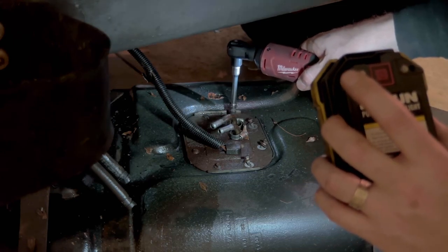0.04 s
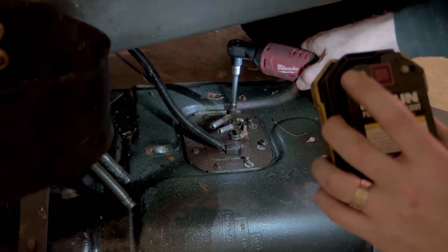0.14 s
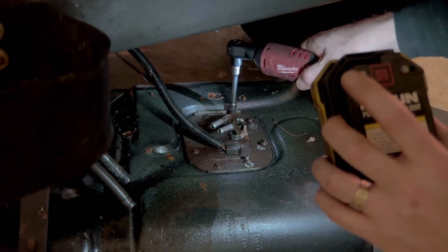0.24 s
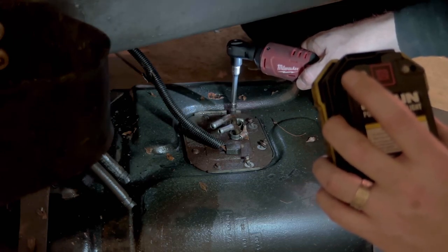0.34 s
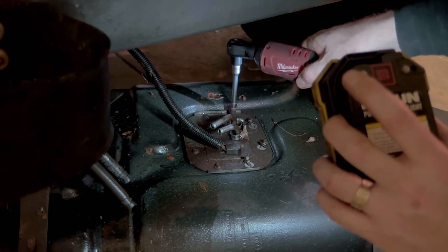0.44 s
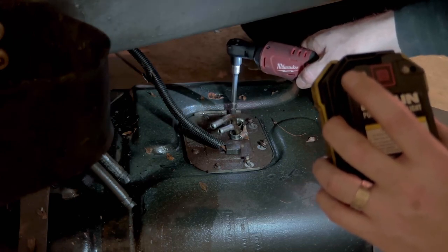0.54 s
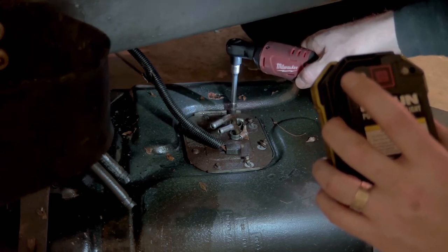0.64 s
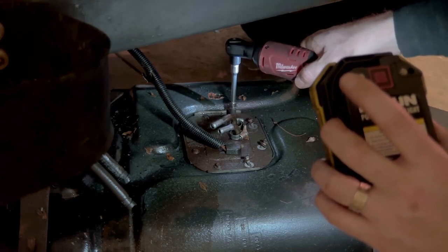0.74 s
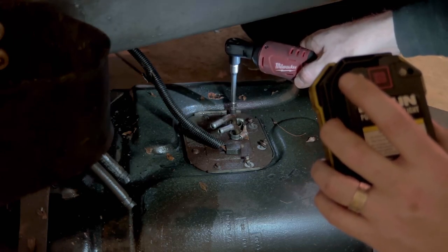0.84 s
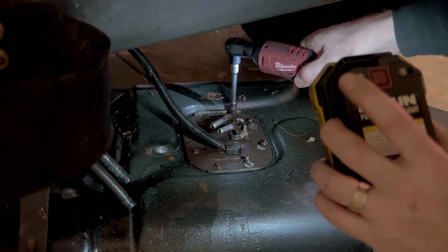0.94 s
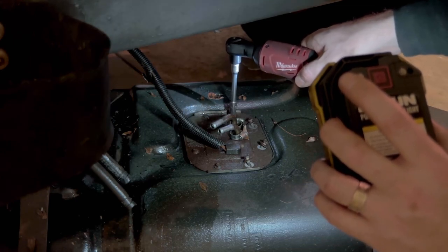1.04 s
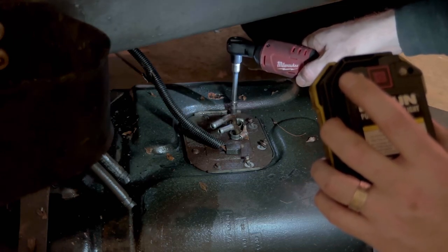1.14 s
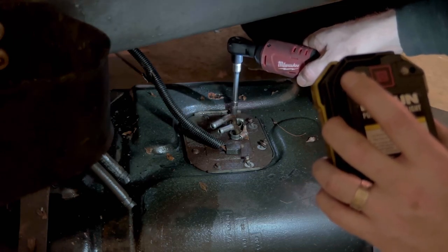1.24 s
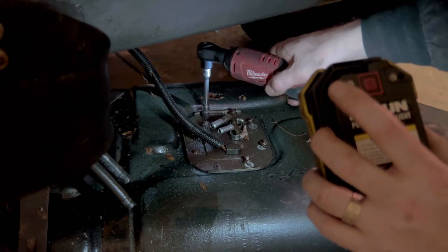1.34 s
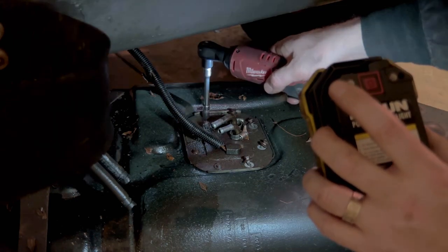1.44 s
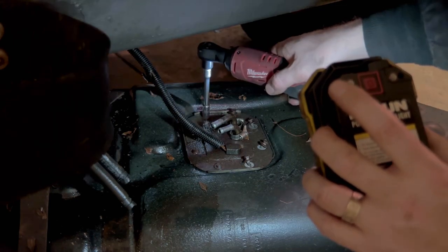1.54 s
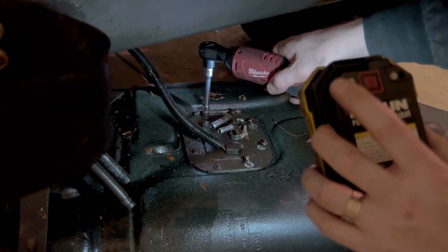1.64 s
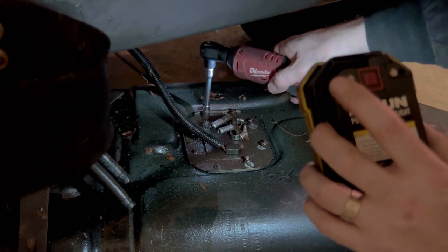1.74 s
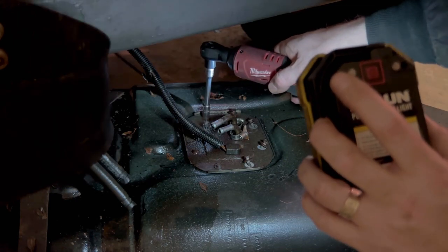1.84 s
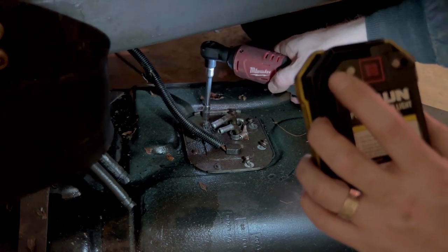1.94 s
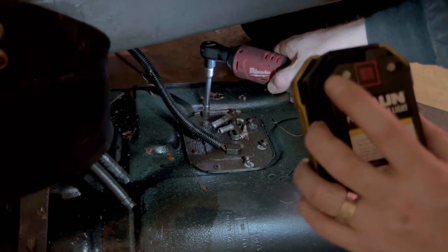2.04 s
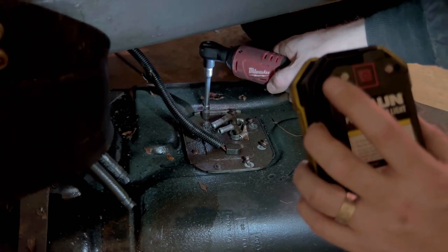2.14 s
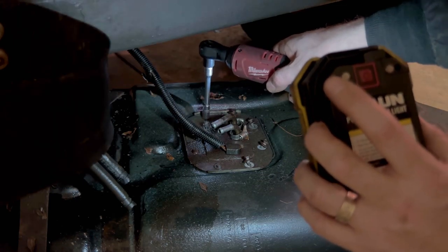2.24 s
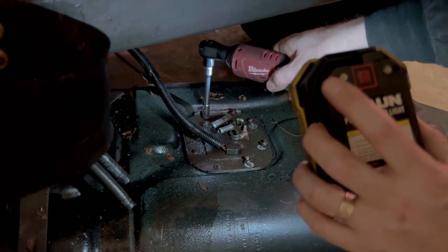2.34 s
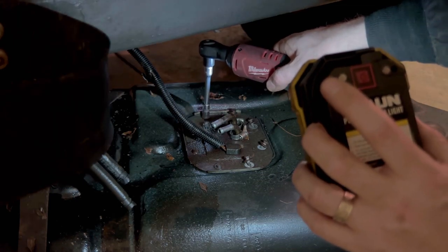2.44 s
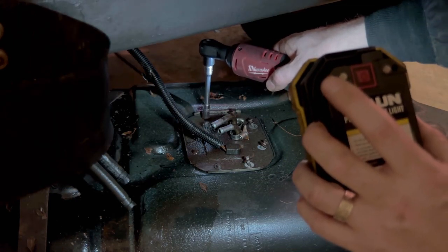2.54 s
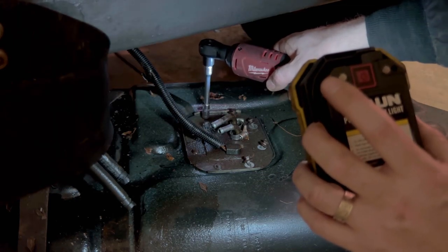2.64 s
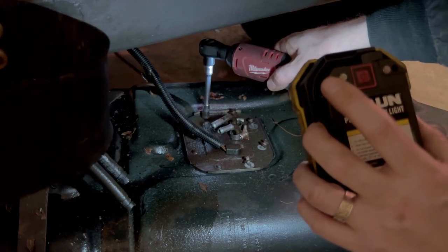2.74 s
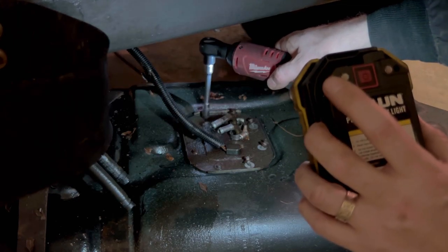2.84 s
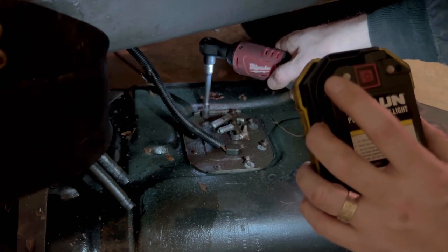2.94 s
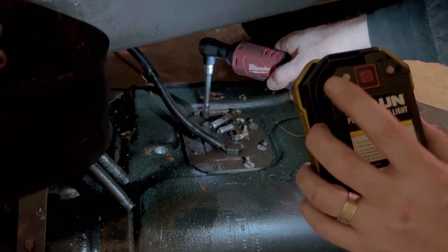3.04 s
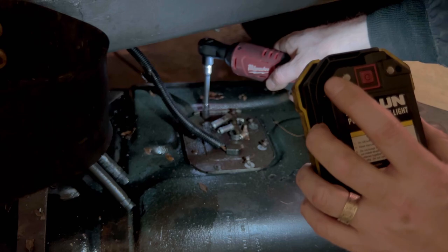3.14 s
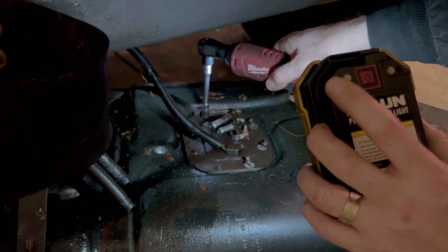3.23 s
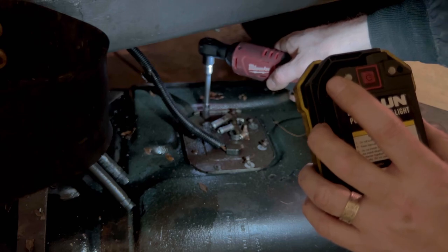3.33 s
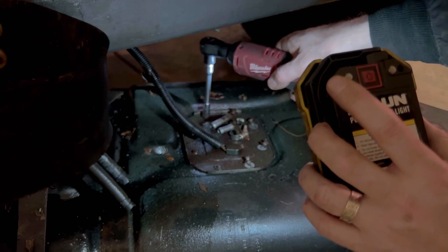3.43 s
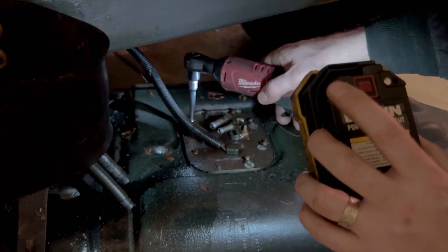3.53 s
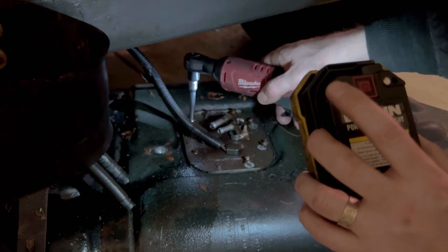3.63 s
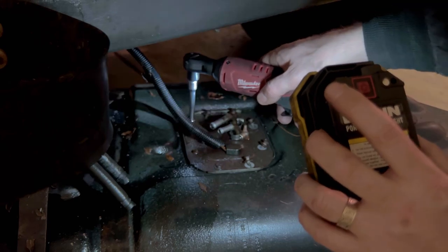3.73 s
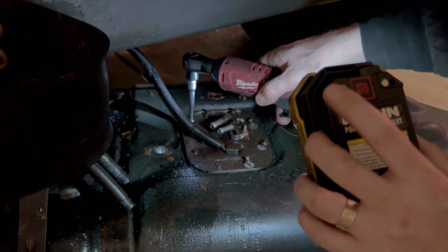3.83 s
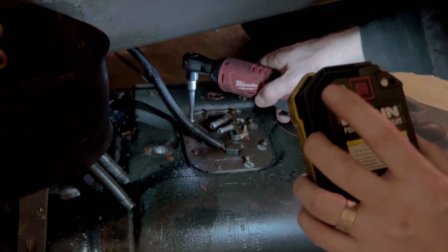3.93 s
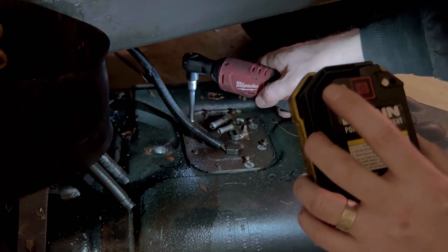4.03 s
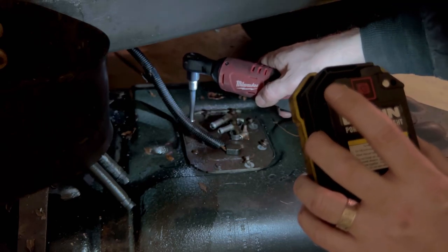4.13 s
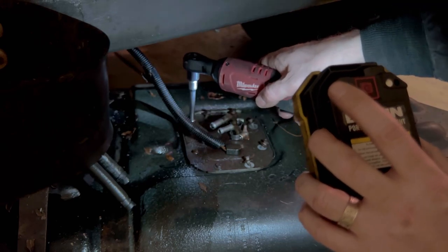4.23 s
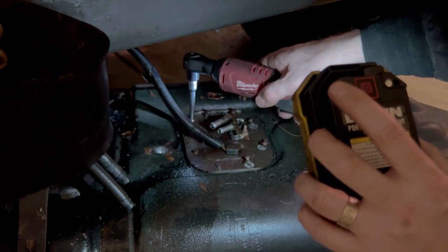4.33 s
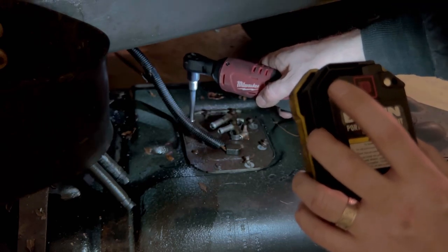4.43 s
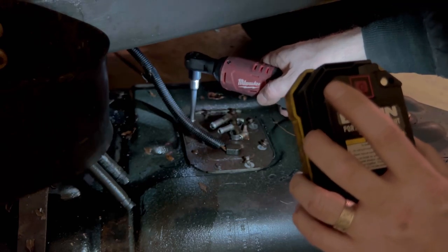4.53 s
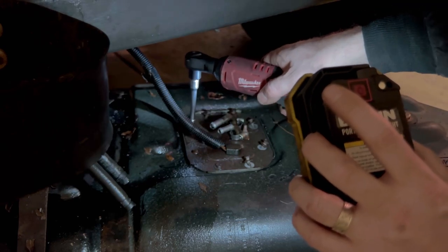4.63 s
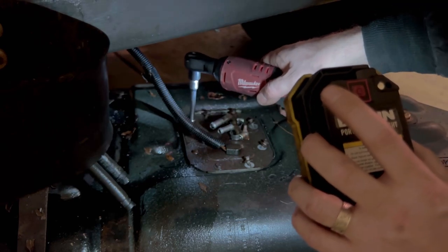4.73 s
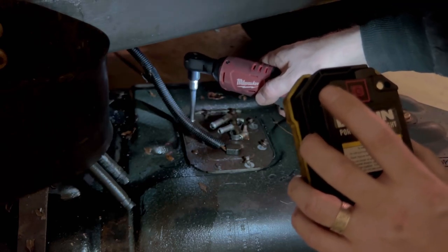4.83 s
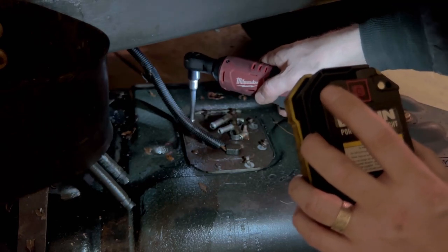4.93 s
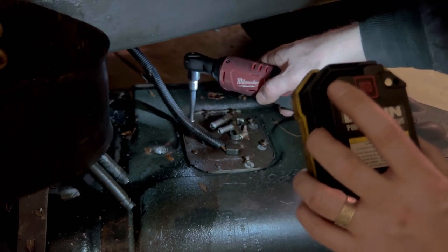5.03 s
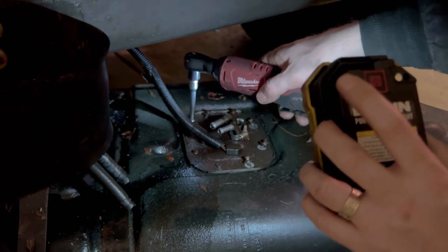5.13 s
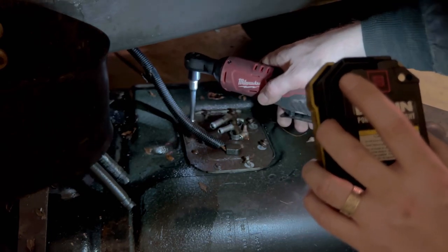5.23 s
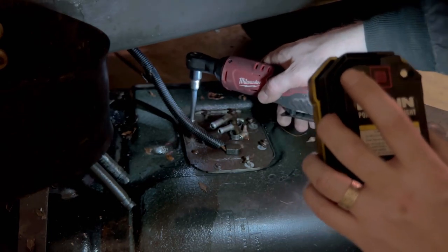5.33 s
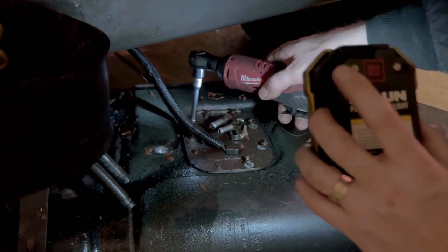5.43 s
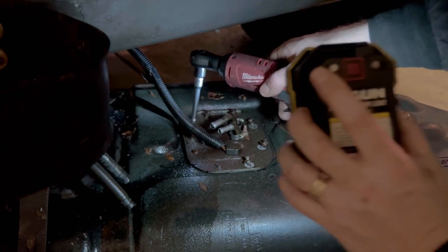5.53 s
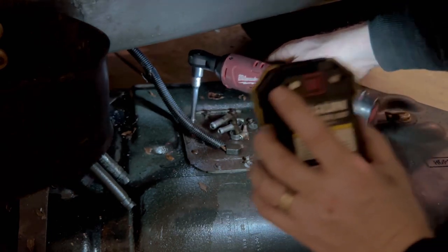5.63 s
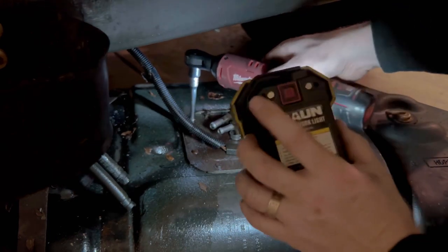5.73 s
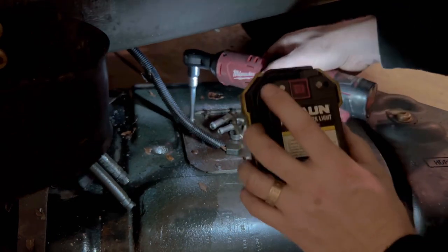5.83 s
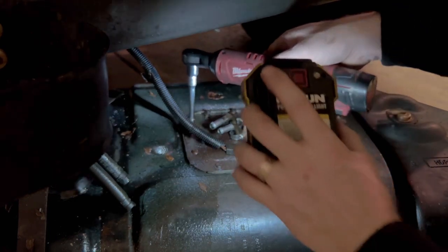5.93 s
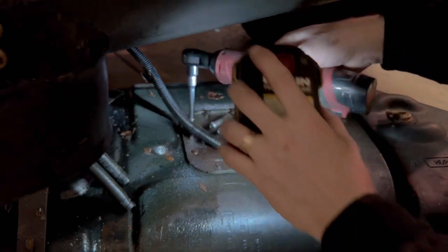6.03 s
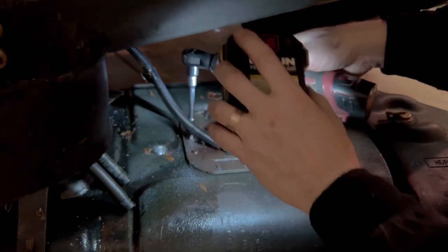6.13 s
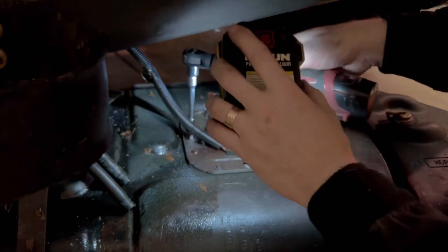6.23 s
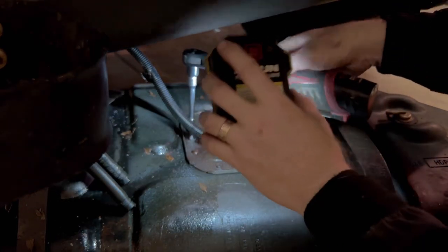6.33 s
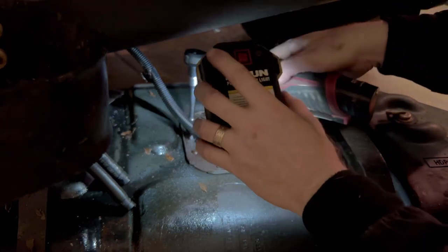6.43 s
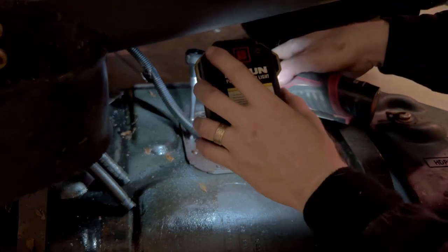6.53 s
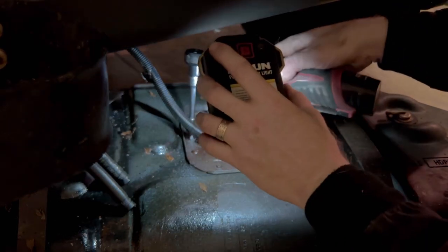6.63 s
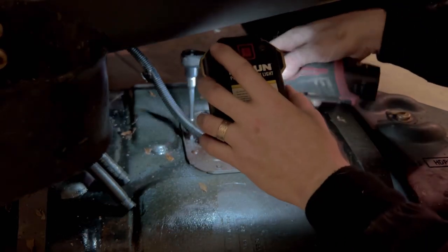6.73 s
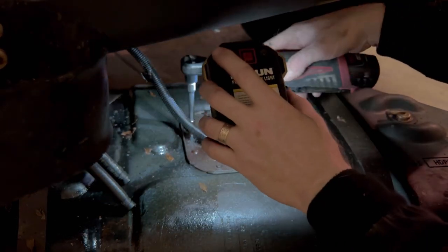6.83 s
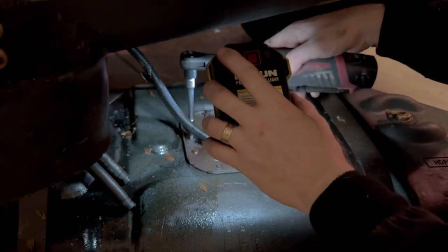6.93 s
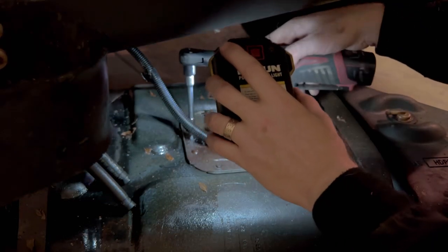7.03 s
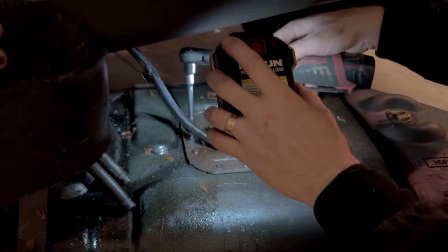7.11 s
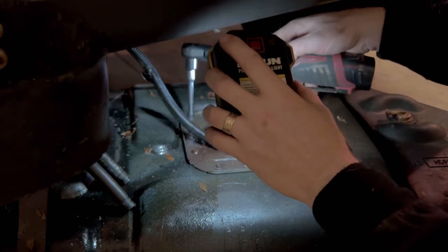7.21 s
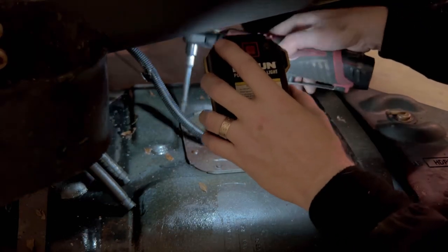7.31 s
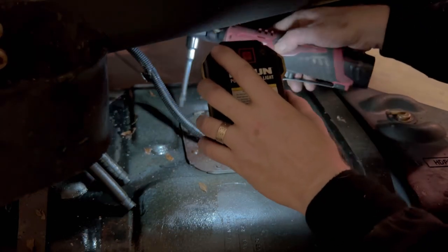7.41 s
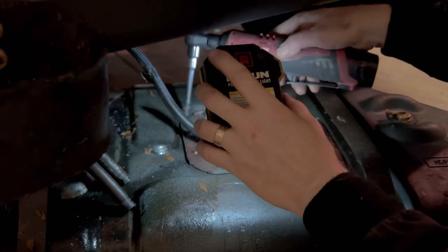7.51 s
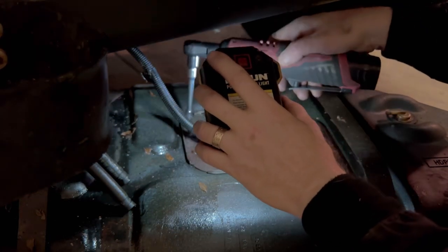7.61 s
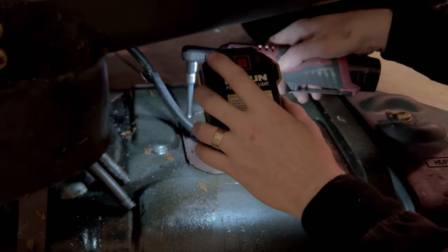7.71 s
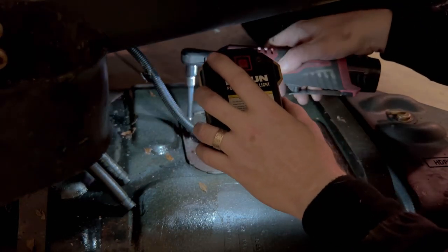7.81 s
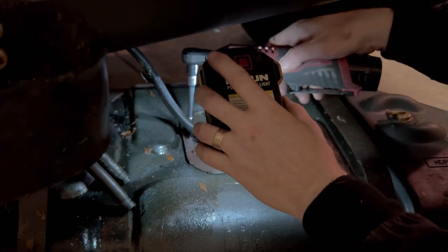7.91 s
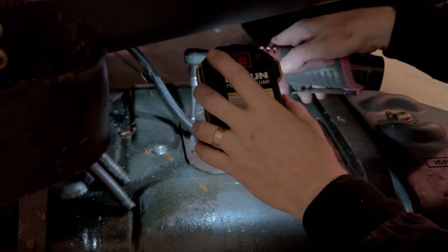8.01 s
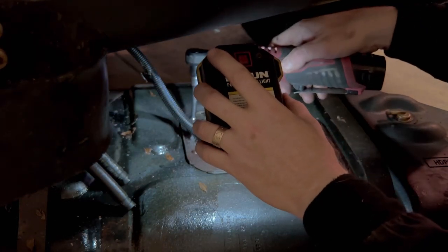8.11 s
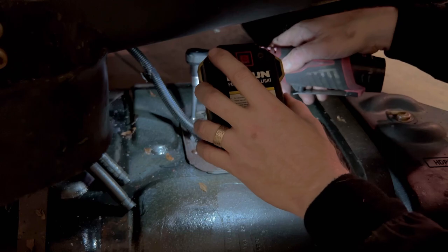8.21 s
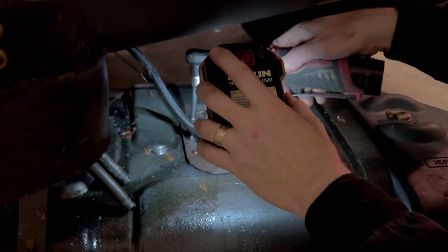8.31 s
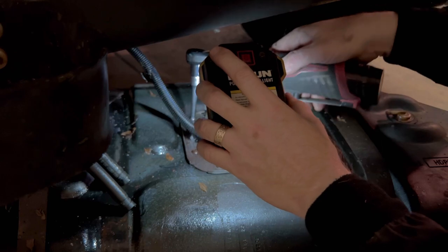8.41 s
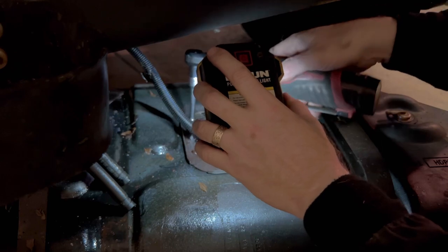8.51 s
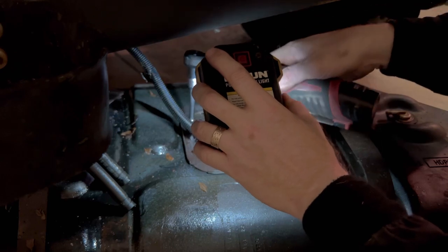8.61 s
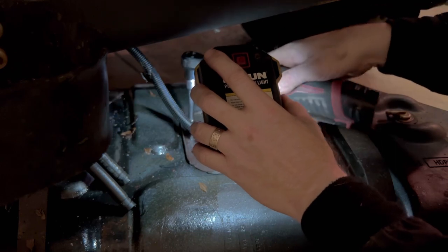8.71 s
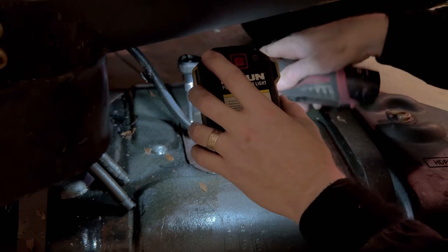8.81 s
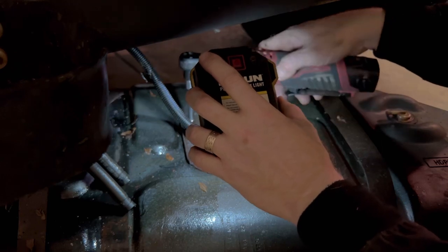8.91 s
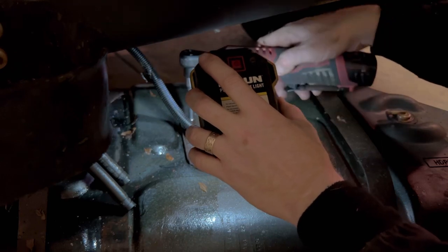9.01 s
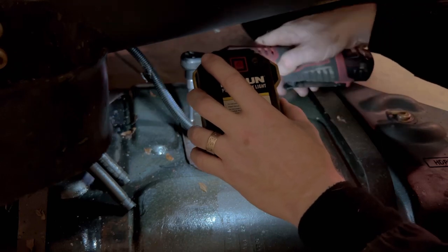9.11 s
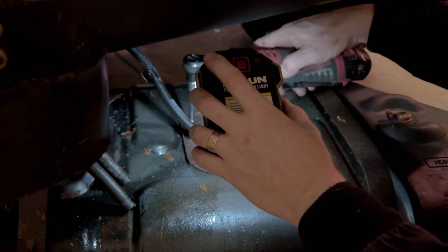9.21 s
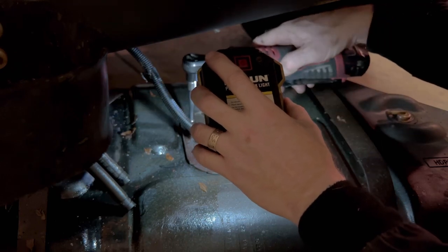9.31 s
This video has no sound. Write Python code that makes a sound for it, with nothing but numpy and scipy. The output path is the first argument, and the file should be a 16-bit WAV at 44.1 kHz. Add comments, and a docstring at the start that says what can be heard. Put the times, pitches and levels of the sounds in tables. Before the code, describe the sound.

Close in a garage, a cordless ratchet is already running, its gears whirring with fast pawl clicks and a thin high motor whine. A knock, then the bit bears down and the hollow steel tank booms. The run breaks off abruptly, a second starts and coasts down into slowing clicks. Tool knocks, a brief sleeve rustle and sparse taps follow over low rumble.

```python
"""A cordless ratchet runs in bursts on screws in a steel tank, close by in a garage. A motor drives a crank through gears;
each turn rocks the yoke, filtered noise makes the gear whirr, and the pawl clicks over the teeth into steel resonances.
The tank booms in noise and crank-rate tones when the bit bears on it. A cut breaks off one run in mid-sound; the last
coasts down. Damped bursts make the knocks of tool and hand; a low rumble, faint hiss and sleeve rustle are shaped noise."""
import sys
import numpy as np
from scipy import signal
from scipy.fft import rfft, irfft, next_fast_len
from scipy.io import wavfile
from scipy.ndimage import uniform_filter1d, map_coordinates

SR = 44100
rng = np.random.default_rng(int(sys.argv[2]) if len(sys.argv) > 2 else 0)


def store_wav(level_fs):
    """Save 16-bit WAV to argv[1]."""
    pcm = np.round(np.clip(np.atleast_2d(level_fs), -1, 1) * 32767)
    wavfile.write(sys.argv[1], SR, pcm.T.astype(np.int16))


def gain_from_db(level_db):
    """Convert decibel levels to linear amplitude factors (20 dB per decade)."""
    decades = np.asarray(level_db, float) / 20
    return 10 ** decades


N = 412762
T = np.arange(N) / SR
CUT_S, RESTART_S = 3.563, 4.025

# Stretches on a screw. Each row: start in seconds, end in seconds, motor whine in Hz before sag and droop,
# sag at the bite in Hz, relative whine level in dB.
STRETCHES = [(0, 1.34, 1937, 0, -33), (1.34, 3.563, 1938, 62, -32), (4.008, 5.15, 1925, 45, -35.5)]
# Pawl drops in one crank turn. Each row: phase from 0 to 1, relative level in dB.
TEETH = [(.47, 1.5), (.62, 0.5), (.81, -10)]
# Ringing panels of the hollow tank. Each row: frequency in Hz, relative level in dB, t60 in seconds.
TANK_PANELS = [(114.5, -1, .3), (188, -1, .2), (264, -2.5, 0.25), (377.6, -5, 0.22), (451, -8, 0.12),
               (517, -6, .08), (720, -3.5, 0.087), (870, 0.5, 0.083), (1303, -9.5, .1), (1437, -9.5, 0.069),
               (1510, -3.5, .1)]


def unit(x):
    """Scaled to rms 1."""
    return x / np.sqrt(np.mean(x ** 2) + 1e-20)


def curves(rows):
    """One value per sample for each column after the time."""
    s, *cols = np.transpose(rows)
    return [np.interp(T, s, c) for c in cols]


def during(*spans, edge_s=.002):
    """1 inside any (from, to) span, 0 outside, with soft edges."""
    inside = sum((T >= start) & (T <= end) for start, end in spans)
    return np.abs(uniform_filter1d(inside * 1., size=round(edge_s * SR)))


def wobble(rate):
    """A smooth random curve, rate knots a second."""
    return map_coordinates(rng.standard_normal(int(N * rate / SR) + 4), [T * rate])


def filtered(x, response):
    """x times a complex response of frequency."""
    m = next_fast_len(N + 8192)  # room for the ring-out
    return irfft(rfft(x, m) * response(np.fft.rfftfreq(m, 1 / SR)), m)[:N]


def along(points, hz):
    """(Hz, value) points on a log axis."""
    f, v = np.transpose(points)
    return np.interp(np.log(hz + 1), np.log(f + 1), v)


def noise(spectrum):
    """Coloured noise of rms 1."""
    return unit(filtered(rng.standard_normal(N), lambda hz: gain_from_db(along(spectrum, hz))))


def resonances(peaks):
    """Causal response of a few (Hz, width Hz, dB) resonances, alternating in sign."""
    def response(f):
        total = 0
        for k, (centre, width, db) in enumerate(peaks):
            damping = 1j * f * width
            total = total + (-1) ** k * gain_from_db(db) * damping / (centre * centre - f * f + damping)
        return total
    return response


def ridged(x, depth_db):
    """Many small housing modes: narrow ridges of gain that drift as the grip shifts."""
    z = signal.stft(x, nperseg=2048)[2]
    across_hz = uniform_filter1d(rng.standard_normal(z.shape), size=3, axis=0)
    field = uniform_filter1d(across_hz, size=14, axis=1)
    return signal.istft(z * gain_from_db(depth_db * unit(field)), nperseg=2048)[1][:N]


def orders(turns, table):
    """Unsteady tones at whole multiples of the crank rate."""
    return sum(gain_from_db(db + 4.03 * wobble(5)) * np.sin(2 * np.pi * (k * turns + k * k / 7)) for k, db in table)


def room():
    """Unsteady low rumble, faint hiss that stirs with it, and a sleeve brushing past."""
    # Rumble swells. Each row: time in seconds, level in dB.
    rumble_level = [(3.6, -43), (5.8, -42), (6.0, -46.5), (7.7, -48), (8.1, -43), (8.4, -39), (8.63, -43.5),
                    (8.95, -39.5), (9.36, -41.5)]
    # Rumble colour. Each row: frequency in Hz, relative density in dB per Hz.
    rumble_colour = [(15, -60), (25, -24.5), (46, -12), (64, 0.5), (168, -17.5), (184, -31.5), (220, -22.5),
                     (300, -22.5), (390, -50.5), (660, -120)]
    # Hiss colour. Each row: frequency in Hz, relative density in dB per Hz.
    hiss_colour = [(120, -39.5), (200, -8.5), (320, -8), (700, -14.5), (1300, -19.5), (4300, -26.5),
                   (4700, -32), (8400, -35), (8900, -39.5), (13500, -39.5), (16000, -54)]
    # Sleeve and hand sliding. Each row: start in seconds, length in seconds, level in dB.
    rustle_strokes = [(5.747, .8, -57.5), (5.81, 0.24, -52)]
    # Cloth colour. Each row: frequency in Hz, relative density in dB per Hz.
    cloth_colour = [(590, -46), (1000, -15), (1490, -3), (3410, -2), (9690, -12.5), (11500, -13.5),
                    (15500, -30)]
    rumble_db, = curves(rumble_level)
    rumble = gain_from_db(rumble_db + 1.5 * wobble(6.8)) * noise(rumble_colour)
    hiss_db = -56 + 0.69 * (rumble_db + 45)  # grows 0.69 dB per dB of rumble
    hiss = gain_from_db(hiss_db + wobble(2.2)) * noise(hiss_colour)
    strokes = sum(gain_from_db(db) * np.sin(np.pi * np.clip((T - s) / length, 0, 1)) for s, length, db in rustle_strokes)
    rustle = strokes * gain_from_db(1.0 * wobble(65)) * noise(cloth_colour)
    return rumble + hiss + rustle


def ring(modes, t):
    """Decaying sines of struck steel; every blow excites each mode a little differently."""
    return sum(gain_from_db(db + rng.normal(0, 4.4) - 60 * t / t60) * np.sin(2 * np.pi * hz * t) for hz, db, t60 in modes)


def knocks():
    """Each knock is a short damped burst, dull or bright, with steel and tank ring and the garage's diffuse tail."""
    # Tool on tank and hand on tool. Each row: time in seconds, relative crack level in dB,
    # low level in dB re crack, treble level in dB re crack.
    hits = [(1.352, -6, -9.5, -14), (3.9282, -34, -22, -3), (5.5228, -20, -10, -1), (5.687, -29.5, -14, -5),
            (5.7015, -19.5, -4, -7.5), (5.736, -31, -0.5, -9), (6.1926, -53, -11.5, -17),
            (6.7162, -12.5, -15.5, -6.5), (6.859, -46, -1, -14), (7.187, -52.5, 3.5, -9),
            (7.236, -50, -4, -17), (7.254, -49, -3, -23), (7.8205, -51, 12, -21), (7.9905, -37, 1.5, -25),
            (8.157, -62, 14, -18), (8.2945, -16.5, -11.5, -15), (8.4916, -49, -5, -16.5),
            (8.7632, -40.5, -6, -9), (8.8166, -41, 1, -19.5), (8.9306, -50, -7, -18),
            (8.9522, -41, 2.5, -11), (9.1894, -49, -2, -3), (9.338, -46, -9, -15.5)]
    # Crack, thud, body and treble. Each row: low edge in Hz, high edge in Hz, blow t60 in seconds,
    # garage t60 in seconds.
    knock_bands = [(1910, 4500, .018, 0.3), (90, 630, 0.14, 0.43), (610, 2100, 0.045, 0.43),
                   (4500, 8000, 0.034, 0.34)]
    # Extension bar modes. Each row: frequency in Hz, relative level in dB, t60 in seconds.
    bar_modes = [(1850, -25, .2), (2700, -24, .2), (3270, -13, .07), (3750, -20, .2), (6700, -31, .15)]
    garage_db, boom = -16, 0.38  # garage re blow; dB of tail per dB of low: dull knocks linger
    out, t = np.zeros(N + SR), np.arange(SR // 2) / SR
    filters = [signal.butter(3, row[:2], "bandpass", fs=SR, output="sos") for row in knock_bands]
    swell = 1 - np.exp(-t / 0.0019)  # the tail builds up behind the blow
    contact = np.sin(np.pi / 2 * np.clip(t / .0006, 0, 1)) ** 2  # 0.6 ms rise
    for s, db, low_db, treble_db in hits:
        tail_db = garage_db + boom * np.clip(low_db + 15, 0, 11)
        white_blow = gain_from_db(1.4 * treble_db + 1.5 - 60 * t / 0.016)
        white_tail = swell * gain_from_db(1.6 * treble_db + garage_db + 7.0 - 60 * t / 0.2)
        white = (white_blow + white_tail) * rng.standard_normal(len(t))  # first contact is white
        sound = ring(bar_modes, t) + gain_from_db(low_db - 6.5) * ring(TANK_PANELS, t)
        band_db = [0, low_db - 4, low_db + 2, treble_db]
        for band, (_, _, blow_t60, room_t60), level in zip(filters, knock_bands, band_db):
            shape = gain_from_db(-60 * t / blow_t60) + swell * gain_from_db(tail_db - 60 * t / room_t60)
            settled = signal.sosfilt(band, rng.standard_normal(len(t) + 900))[900:]  # skip the filter's onset
            sound = sound + gain_from_db(level) * shape * unit(settled)
        out[round(s * SR):][:len(t)] += gain_from_db(db - 4) * (white + contact * sound)
    return out[:N]


def motor_pitch():
    """Whine pitch and level: each bite drags the motor down, it recovers, then droops slowly."""
    recover_s, droop_hz_per_s, sag_db_per_hz = .125, 2.8, .14
    starts = [row[0] for row in STRETCHES]
    current = np.searchsorted(starts, T, "right") - 1
    start, _, hz, bite, db = np.transpose(STRETCHES)[:, current]
    sag = bite * np.exp(-(T - start) / recover_s)
    return hz - sag - droop_hz_per_s * (T - start), db - sag_db_per_hz * sag


def whine():
    """A thin stack of tones from the motor and its speed control."""
    # Tones of the stack. Each row: multiple of the whine pitch, relative level in dB.
    whine_orders = [(1, -10.5), (3, 0), (4, -13), (5, -27)]
    hz, db = motor_pitch()
    cycles = np.cumsum(hz + .6 * wobble(15)) / SR
    stack = sum(gain_from_db(level) * np.sin(2 * np.pi * k * cycles) for k, level in whine_orders)
    running = during((0, CUT_S), STRETCHES[-1][:2])
    return running * gain_from_db(db + 3.0 + 2.7 * wobble(10)) * stack


def crank():
    """Turns per second, and turns so far counted from a pawl drop."""
    whine_per_crank, spin_up_s = 26.33, .04
    release_s, coast_per_s2 = 5.158, 162  # trigger let go; turns per second lost each second
    tooth_s = 5.2909  # a moment at which the pawl drops
    rising = 1 - (T > CUT_S) * np.exp(-np.clip(T - RESTART_S, 0, None) / spin_up_s)
    driven = rising * motor_pitch()[0] / whine_per_crank
    speed = np.clip(driven - coast_per_s2 * np.clip(T - release_s, 0, None), .01, None)
    turns = np.cumsum(speed) / SR
    return speed, turns + (TEETH[0][0] - turns[round(tooth_s * SR)]) % 1


def panels():
    """Vibration from the bit keeps the five lowest tank panels ringing."""
    peaks = [(hz, np.log(1000) / (np.pi * t60), db) for hz, db, t60 in TANK_PANELS[:5]]  # width from t60
    return unit(filtered(rng.standard_normal(N), lambda hz: resonances(peaks)(hz) ** 2))


def tank_drone(turns, pace, rock, drone_db, load):
    """The upper tank panels drone under the bearing bit: ridged noise and tones of the crank."""
    # Upper panel modes. Each row: frequency in Hz, relative density in dB per Hz.
    tank_colour = [(260, -34), (450, -3.5), (587, -0.5), (670, -4.5), (846, -1.5), (1070, -4.5),
                   (2200, -4.5), (2860, -32), (4840, -120)]
    # Crank tones. Each row: multiple of the crank rate, relative level in dB.
    tank_orders = [(7, -13), (8, -14), (9, -17), (10, -13), (11, -14.5), (12, -13.5)]
    grain = unit(rock * ridged(noise(tank_colour), depth_db=3.0))
    tones = (0.69 + 0.4 * load) * pace ** 4 * orders(turns, tank_orders)
    return gain_from_db(drone_db - 2.0) * (grain + tones)


def tank_thump(turns, pace, drone_db, seat):
    """The hollow tank thumps below the drone, and its low panels sing under a seated bit."""
    # Hollow body. Each row: frequency in Hz, relative density in dB per Hz.
    deep_colour = [(53, -33), (90, -4), (183, -1), (216, -7.5), (254, -2.5), (378, 1), (450, -7.5),
                   (580, -37), (990, -120)]
    # Crank tones. Each row: multiple of the crank rate, relative level in dB.
    deep_orders = [(2, -9), (3, -11), (4, -11), (5, -6)]
    # grows 1.2 dB per dB of drone, 3 dB more when seated
    thump_db = -40 + 1.2 * (drone_db + 31.5) + 3 * seat + 0.5 * wobble(9)
    boom = noise(deep_colour) + 0.83 * pace ** 4 * orders(turns, deep_orders)
    mix = (1 - 0.17 * seat) * boom + gain_from_db(-4.5) * seat * panels()
    return gain_from_db(thump_db - 1.84 + 1.2 * wobble(30)) * mix


def shaft_tones(turns, pace, whirr_db, hum_size):
    """Hum at the crank rate, two tones of the motor shaft and a firm fifth crank order."""
    motor_turns = 4.39 * turns  # motor turns per crank turn
    hum = pace ** 2 * hum_size * gain_from_db(2.7 * wobble(12)) * np.sin(2 * np.pi * turns)
    shaft = np.sin(2 * np.pi * motor_turns) + .45 * np.sin(4 * np.pi * motor_turns)
    motor = pace ** 4 * gain_from_db(whirr_db - 27.5 + 2 * wobble(10)) * shaft
    fifth = pace ** 4 * gain_from_db(whirr_db - 30 + 3 * wobble(8)) * np.sin(2 * np.pi * 5 * turns)
    return hum + motor + fifth


def yoke(turns):
    """Once a turn the yoke slaps the head; each mode takes its own share of each slap."""
    # Ratchet head and extension bar. Each row: frequency in Hz, width in Hz, relative level in dB.
    head_modes = [(2310, 910, -1), (3590, 550, 0), (5850, 720, -1.5)]
    phase, turn = turns % 1, turns.astype(int)
    slap = (1 - np.exp(-phase / 0.017)) * np.exp(-phase / 0.23)
    shares = gain_from_db(2.5 * rng.standard_normal((turn[-1] + 1, len(head_modes))))
    total = 0
    for k, mode in enumerate(head_modes):
        burst = shares[turn, k] * slap * rng.standard_normal(N)
        total = total + filtered(burst, resonances([mode]))
    return unit(total)


def gear_whirr(turns, pace, rock, whirr_db, pawl_db, load):
    """Meshing gears whirr as uneven noise with yoke slaps; the topmost treble fizzes with the pawl level."""
    # Gear colour. Each row: frequency in Hz, relative density in dB per Hz.
    gear_colour = [(500, -36), (700, -17), (820, -6), (1050, -11), (1700, -9), (2500, -6), (3200, -2),
                   (4100, -1), (4900, -7.5), (5800, -0.5), (6400, -6.5), (7000, -7.5), (8100, -8.5),
                   (9200, -16.5), (10500, -9.5), (12200, -3.5), (13500, -15), (15000, -10.5), (16700, -20)]
    contacts = gain_from_db(0.74 * wobble(500) + 0.75 * wobble(40))  # uneven tooth contacts
    mesh = rock * contacts * ridged(noise(gear_colour), depth_db=2.33)
    body = filtered(mesh, lambda hz: 1 / (1 + (hz / 9500) ** 16))
    whirr = gain_from_db(whirr_db - 2.5) * (unit(body) + (0.32 + 0.3 * load) * pace * yoke(turns))
    fizz = gain_from_db(pawl_db - 3.0) * (0.15 + 0.94 * pace) ** .9 * unit(mesh - body)
    return whirr + fizz


def pawl(turns, level_db):
    """The pawl drops over two teeth a turn and rebounds; every drop rings the small steel head."""
    # Single clicks at low speed. Each row: time in seconds, relative level in dB.
    slow_clicks = [(4.047, -11), (4.0555, -13.5), (4.0959, -3), (4.1135, -7.5), (5.3867, -18),
                   (5.3915, -17), (5.4159, -22.5), (5.4242, -18), (5.4435, -24), (5.4531, -16),
                   (5.4957, -15.5), (5.5042, -19), (5.5528, -13), (5.5664, -17)]
    # Steel ring, applied twice. Each row: frequency in Hz, width in Hz, relative level in dB for one pass.
    pawl_modes = [(12050, 1300, 3), (14600, 1100, -12.5), (6340, 1100, -1)]
    # Between these two times in seconds the clicks of the last run follow the crank's turns.
    steady = (4.122, 5.378)
    whole = np.arange(1, int(turns[-1]))
    draw = rng.standard_normal((len(whole), 6))
    blows, sample = np.zeros(N), np.arange(N)
    drift = wobble(3)[np.interp(whole, turns, sample).astype(int)] * 0.02
    for k, (phase, db) in enumerate(TEETH):
        at = np.interp(whole + phase + drift + .013 * draw[:, k], turns, sample).astype(int)
        blows[at] = gain_from_db(db + 3.5 * draw[:, 3 + k] + level_db[at] + 27.0)  # 3.5 dB of scatter
    blows = blows * ((T < CUT_S) | ((T > steady[0]) & (T < steady[1])))
    for s, db in slow_clicks:
        blows[round(s * SR)] = gain_from_db(db + 20.5)
    t = np.arange(SR // 20) / SR
    rattle = gain_from_db(-33 - 60 * t / .045) * rng.standard_normal(len(t))  # nearby steel answers each drop
    blows = blows + signal.fftconvolve(blows, rattle)[:N]
    return filtered(blows, lambda hz: resonances(pawl_modes)(hz) ** 2)  # squared: a narrow ping with steep skirts


def ratchet():
    """The crank's speed and the hand's bearing drive whirr, yoke slaps, pawl clicks, tank and shaft tones."""
    # The hand on the tool. Each row: time in seconds, relative gear whirr in dB,
    # bearing on the tank as relative drone in dB.
    hand_drive = [(0, -15.5, -31), (.7, -16.5, -34.5), (1.09, -17, -42.5), (1.335, -18.5, -40),
                  (1.36, -23.5, -24), (1.385, -16.5, -19.5), (1.5, -14.5, -23.5), (1.7, -12.5, -29),
                  (2.0, -16, -30), (2.4, -15.5, -32.5), (3.56, -17, -36), (4.025, -38.5, -47),
                  (4.06, -24, -30.5), (4.11, -15.5, -21.5), (4.16, -15, -21.5), (4.57, -13.5, -26),
                  (4.72, -14.5, -28.5), (5.07, -15.5, -23), (5.36, -20.5, -30), (5.587, -37.5, -37.5),
                  (5.68, -50, -51)]
    # Bit seated hard, the tank hums at the crank rate. Each row: start in seconds, end in seconds,
    # added hum in dB at full speed.
    seated_spans = [(1.36, 1.964, -32), (4.116, 5.25, -35)]
    halt_s = 5.69
    whirr_db, drone_db = curves(hand_drive)
    drone_db = drone_db + 0.67 * wobble(9)
    pawl_db = np.minimum(-22, whirr_db - 5) + 0.98 * wobble(9)  # capped 5 dB under the whirr
    seated = [during(row[:2], edge_s=0.069) for row in seated_spans]
    hum_size = gain_from_db(-53) + sum(gain_from_db(row[2]) * gate for row, gate in zip(seated_spans, seated))
    speed, turns = crank()
    pace = speed / speed.max()
    rock = 1 + 0.11 * np.sin(2 * np.pi * (turns + .05))  # gear load swings with the crank
    load = np.clip((drone_db - whirr_db + 16.0) / 8, 0, 1)  # bearing on the tank hardens the slap
    gears = gear_whirr(turns, pace, rock, whirr_db, pawl_db, load)
    tank = tank_drone(turns, pace, rock, drone_db, load) + tank_thump(turns, pace, drone_db, sum(seated))
    shafts = shaft_tones(turns, pace, whirr_db, hum_size)
    running = during((0, CUT_S), (RESTART_S, halt_s))
    return running * (gears + tank + shafts) + pawl(turns, pawl_db)


def scene():
    """All sources at one microphone."""
    return (room() + knocks() + whine() + ratchet())[None]


def top_cut(x):
    """Nothing passes above the cut-off."""
    return signal.sosfilt(signal.butter(12, 16670, fs=SR, output="sos"), x)


def record(dry):
    """Soft overload near full scale, then a steep treble roll-off."""
    held = dry[0] / (1 + np.abs(dry[0] / .9) ** 5) ** (1 / 5)
    rolloff = lambda hz: gain_from_db(-17 * (1 + np.tanh((hz - 15900) / 70)))  # 34 dB down above 15.9 kHz
    return top_cut(filtered(held, rolloff)[None])


dry = scene()
out = record(dry)
store_wav(out)
```